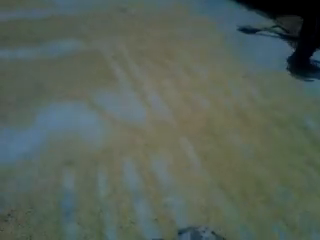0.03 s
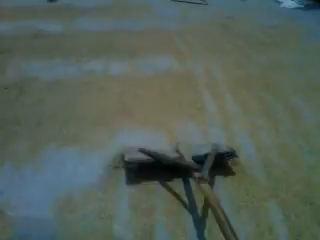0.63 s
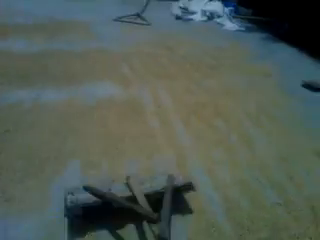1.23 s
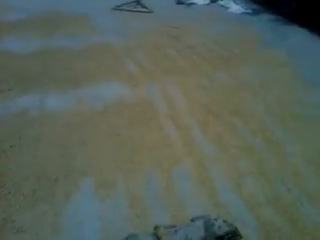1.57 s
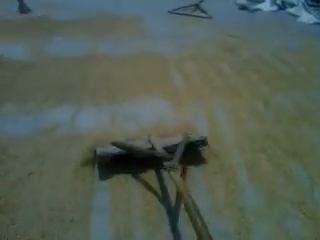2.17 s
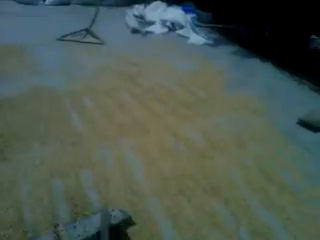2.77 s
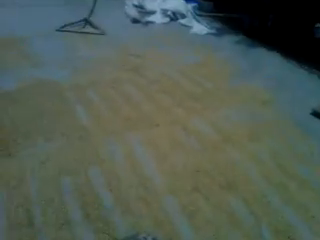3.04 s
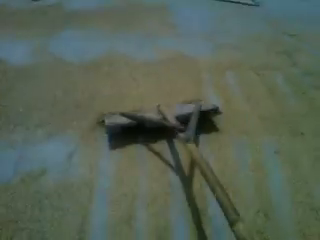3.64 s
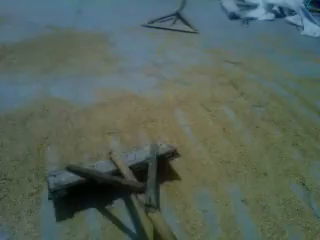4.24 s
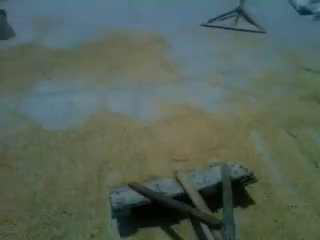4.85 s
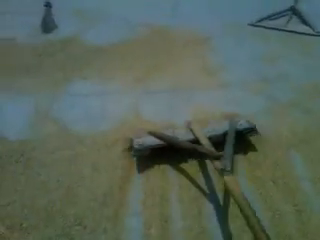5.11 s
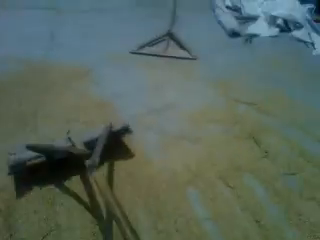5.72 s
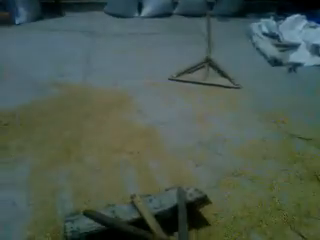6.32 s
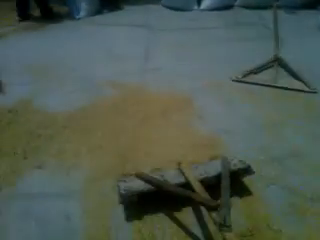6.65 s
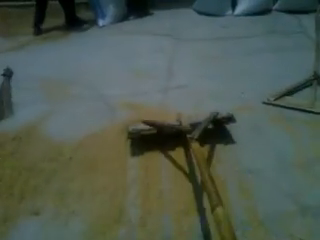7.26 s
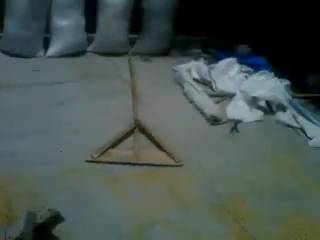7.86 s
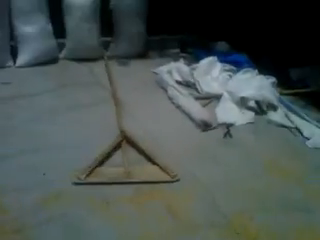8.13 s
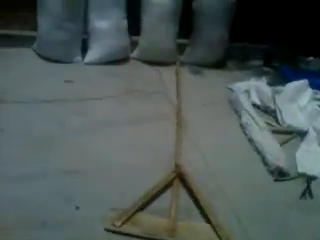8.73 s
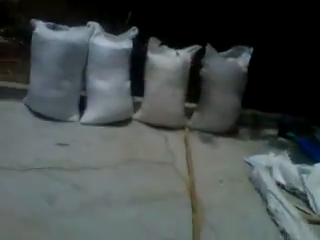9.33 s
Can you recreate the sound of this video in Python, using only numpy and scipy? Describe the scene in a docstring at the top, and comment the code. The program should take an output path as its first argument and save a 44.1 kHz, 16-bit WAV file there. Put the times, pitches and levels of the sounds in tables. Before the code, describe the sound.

Close by, a wooden rake is pushed through dry grain on a concrete yard and drawn lightly back, five times. Each push rasps and rustles, with kernels cracking and scattering. Between pushes the wooden head skids and lands with hollow knocks, and a tooth gives an occasional tiny, sharp squeak. The work ends in light scuffs and soft bumps. A faint low outdoor rumble lies underneath.

```python
"""Raking dry grain

A wooden rake is pushed and drawn back through dry grain on a concrete yard, five strokes, close by.
Kernels crushed under the tines (the rake's teeth) make the wooden head rasp and knock. Husks rustle,
and each push builds a heap that spills and sprays kernels. Between pushes the head skids and lands with
a hollow ring, and a tine sometimes squeaks. The work ends in light scuffs and bumps, over a low rumble."""
import sys
import numpy as np
from scipy import signal
from scipy.fft import rfft, irfft
from scipy.io import wavfile
from scipy.ndimage import uniform_filter1d

SR = 44100
rng = np.random.default_rng(int(sys.argv[2]) if len(sys.argv) > 2 else 0)


def dump_mix(stems):
    """Bounce the given channels to the path in sys.argv[1] as a 16-bit WAV at rate SR."""
    frames = np.atleast_2d(stems).T  # one column per channel
    limited = np.clip(frames, -1, 1)  # hard clip at full scale
    pcm = np.round(limited * 32767).astype(np.int16)
    wavfile.write(sys.argv[1], SR, pcm)


N = 417627
TIME = np.arange(N) / SR

# the modes (natural ringing tones) of the rake's head and handle: pitch_hz, width_hz, level_db
HEAD_MODES = [(161, 47, -17), (302.4, 76, -6), (420.6, 75, -3), (506.6, 102, -2.5), (693.6, 108, -3.5),
              (936, 145, -8.5), (1104, 158, -3), (1366, 202, 0.5), (1488, 170, 0), (1900, 990, -16.5)]
# tone colours of dry husks, spilling grain, grating wood and scuffed concrete: pitch_hz, level_db
HUSK_COLOUR = [(1500, -31), (2000, -27.5), (2400, -6), (2620, 7), (2950, 4), (3300, 4.5), (3650, -6),
               (4000, -33), (4600, -48), (5200, -30.5), (7000, -63.5)]
SPILL_COLOUR = [(2600, -21.5), (3300, 1), (3900, -3.5), (4500, -9), (5100, -17), (6000, -25), (6600, -33.5),
                (7200, -43.5), (8000, -74)]
GRATE_COLOUR = [(120, -31), (300, -9.5), (600, 10.5), (1100, 9), (1800, 3.5), (2400, 3.5), (3400, -4),
                (5000, -31), (7000, -56)]
SCUFF_COLOUR = [(500, -16.5), (900, -5), (1500, -3), (2050, 0), (2400, 3), (3200, -8), (4000, -24.5),
                (6000, -54)]
# the heap topples at the far end of a push and cushions the head: peak_s, level_db, cushion_db
HEAP_FALLS = [(0.79, -28, -4.5), (2.2, -27.5, 0), (3.879, -32.5, -5), (5.46, -30.5, -2.5), (7.27, -32, 0),
              (7.46, -41, 1.5)]


def stroke_level(layer, rest_db, heap_db=0, flow=0):
    """Level in dB of one layer: it follows the rake's speed and pressure, the heap and its flow."""
    # pushes into the grain, then light draws back over it:
    # start_s, attack_s, hold_s, release_s, rasp_db, husk_db, spill_db, pressure_change_db
    pushes = [(0.04, 0.43, 0.27, 0.31, -27.5, -33, -44.5, 4.5),
              (1.56, 0.36, 0.27, 0.35, -30, -34.5, -47, 6),
              (3.14, 0.61, 0.19, 0.26, -26, -31, -42.5, -13.5),
              (4.78, .26, 0.43, 0.28, -30.5, -33.5, -47.5, -10.5),
              (6.41, 0.29, 0.59, 0.34, -32.5, -39.5, -46.5, 3)]
    draws = [(0.0, 0.0012, 0.0061, 0.046, -38, -44.5, -53, -10.5),
             (1.13, 0.11, 0.24, 0.19, -35.5, -36, -52, 2),
             (2.57, 0.041, 0.26, 0.032, -40, -38, -53.5, -1.5),
             (2.83, 0.13, 0.11, 0.1, -34.5, -38.5, -49, -10),
             (4.16, .13, 0.378, 0.02, -41.5, -39, -58.5, -2.5),
             (5.75, 0.22, 0.23, 0.067, -36.5, -41.5, -57, -7.5),
             (7.52, 0.29, 0.16, 0.041, -40.5, -42, -60, 6.5),
             (7.9, 0.12, 0.41, 0.24, -42.5, -53, -68, -7.5),
             (8.54, .08, 0.057, 0.091, -40.5, -53.5, -61, -2),
             (8.77, 0.022, 0.026, 0.053, -46, -52, -59, -11.5), (8.92, 0.053, 0.16, 0.23, -45, -53, -66, 5)]
    power = np.zeros(N)
    for start, attack, hold, release, rasp_db, husk_db, spill_db, pressure_db in pushes + draws:
        end = start + attack + hold + release
        now = (TIME >= start) & (TIME < end)
        speed = np.interp(TIME[now], [start, start + attack, end - release, end], [0, 1, 1, 0]) ** 1.153
        progress = (TIME[now] - start) / (end - start) - .5
        level_db = {"rasp": rasp_db, "husk": husk_db, "spill": spill_db}[layer]
        power[now] += (speed * from_db(level_db + (pressure_db + heap_db) * progress)) ** 2
    return 10 * np.log10(power + flow ** 2 + from_db(rest_db) ** 2)


def lifts(ramp_s=0.013):
    """Change in dB, mostly a dip, of the grinding while the head is off the ground."""
    # moments off the ground: start_s, length_s, change_db
    lift_times = [(0.045, .08, -0.5), (0.947, 0.28, 1.5), (2.522, 0.066, -3), (3.123, 0.072, -2),
                  (4.081, 0.085, -4.5), (4.678, 0.11, -4), (6.216, .18, -0.5), (9.406, .1, -1)]
    return sum(db * np.interp(TIME, [s, s + ramp_s, s + length - ramp_s, s + length], [0, 1, 1, 0])
               for s, length, db in lift_times)


def head_weight(wander_db=0.5):
    """The wavering weight on the head, as a gain in dB for its low modes."""
    # weight, less where the grain lies thin: time_s, gain_db
    weight_curve = [(0.0, 0), (2.0, 0), (3.9, 0), (4.07, -8.5), (4.3, -1), (5.4, 0), (6.2, 0), (6.6, 0),
                    (7.2, -0.5), (7.6, 0.5), (8.45, -2.5), (8.9, 3)]
    return in_time(weight_curve) + wander_db * drift(rate=7.3)


def toppling(rise_s=0.068, settle_s=0.12):
    """Flow of grain as each heap swells, falls over and trickles to rest."""
    return sum(from_db(db) * np.exp(-np.maximum((s - TIME) / rise_s, (TIME - s) / settle_s))
               for s, db, _ in HEAP_FALLS)


def cushioning(rise_s=0.06, hold_s=0.24, fall_s=0.15):
    """Change in dB, mostly a loss, of the head's upper modes while it rides on a fallen heap."""
    corners_s = np.cumsum([-rise_s / 2, rise_s, hold_s, fall_s])
    return sum(db * np.interp(TIME - s, corners_s, [0, 1, 1, 0]) for s, _, db in HEAP_FALLS)


def rasp(judder, weight_db, judder_db=1.88, wander_db=1.54):
    """Kernels grind under the tines and ring the head; weight lifts its low modes, a heap dulls it."""
    # the arms bear down and the head groans low: start_s, length_s, boost_db
    leans = [(1.43, 0.099, 6.5), (2.91, 0.12, 3), (5.9, 0.15, 3), (7.78, 0.13, 4.5), (8.0, 0.09, 3)]
    clicks = kernels(per_s=6000, spread_db=3.0) * from_db(judder_db * judder)
    force = evened(soften(clicks, hz=2000, order=4))
    lean_db, cushion_db = arches(leans), cushioning()
    gains_db = [wander_db * drift(rate=40) + (weight_db if hz < 1000 else cushion_db)
                + lean_db * (hz < 600) for hz, _, _ in HEAD_MODES]
    return rms_one(ring_modes(force, HEAD_MODES, gains_db))


def catches(rasp_db, husk_db, tine_hz, per_s=7, wood_hz=1370, count=200):
    """List the moments when a tine catches on kernels: set ones, plus small ones by chance."""
    # a tine catches, grinds and lets go: start_s, length_s, wood_db, tine_db, tine_pitch_hz
    set_catches = [(0.183, 0.014, -38.5, -31.5, 2600), (0.333, 0.0087, -27, -47, 3000),
                   (0.354, 0.031, -27.5, -35.5, 3260), (0.442, 0.015, -21, -24.5, 3300),
                   (0.514, 0.027, -26, -37, 3400), (0.556, 0.016, -33, -35, 3290),
                   (0.673, 0.02, -27, -31, 3040), (0.727, 0.0073, -21, -19, 2960),
                   (0.801, 0.0079, -28, -21, 3040), (0.831, 0.0038, -41.5, -18, 3170),
                   (0.983, 0.0042, -37, -28.5, 2750), (1.061, 0.028, -50, -35, 2680),
                   (1.2163, 0.0039, -50, -28, 2810), (1.285, 0.0045, -28, -22.5, 2900),
                   (1.311, 0.018, -33, -40, 3050), (1.465, 0.038, -30, -38, 2900),
                   (1.552, 0.023, -38.5, -32.5, 3130), (1.879, 0.0097, -35, -29.5, 3400),
                   (2.42, 0.0046, -36, -24, 2760), (2.609, 0.05, -61, -33.5, 2800),
                   (2.681, 0.0066, -37, -32, 2880), (2.711, 0.015, -32, -34, 2750),
                   (2.758, 0.015, -33.5, -49, 2800), (2.866, 0.0034, -29, -35, 3160),
                   (2.971, 0.017, -32.5, -34.5, 3200), (2.984, .005, -27, -32, 2950),
                   (3.02, 0.0088, -45, -28, 3200), (3.056, 0.022, -40.5, -30.5, 2430),
                   (3.09, 0.042, -48, -41.5, 2800), (3.117, 0.0087, -40, -37, 3330),
                   (3.618, 0.0079, -25.5, -26.5, 2900), (3.658, 0.018, -27.5, -40, 3000),
                   (3.7325, 0.0036, -15, -24, 3050), (4.166, 0.022, -49, -39.5, 2700),
                   (4.21, 0.015, -43, -34, 2700), (4.268, 0.004, -49, -30.5, 2750),
                   (4.281, 0.012, -36, -29.5, 2800), (4.3, 0.045, -46, -36, 2850),
                   (4.34, 0.004, -46, -29, 2700), (4.545, 0.02, -35, -39, 2750),
                   (4.634, .016, -40.5, -37.5, 2730), (4.659, 0.0081, -49, -32, 3180),
                   (5.575, 0.014, -44, -29.5, 2950), (5.95, 0.015, -35, -43, 2800),
                   (5.962, 0.038, -33, -33.5, 2950), (6.096, 0.012, -31, -41, 2700),
                   (6.128, 0.013, -34, -31.5, 2720), (6.176, 0.043, -42, -43, 2840),
                   (6.506, 0.061, -43.5, -41.5, 2920), (6.584, 0.022, -32, -42, 2920),
                   (6.66, 0.0086, -29, -37, 2800), (6.708, 0.008, -28, -40, 2750),
                   (6.799, 0.016, -29, -46, 2800), (6.812, 0.016, -26.5, -49, 2800),
                   (6.886, 0.0099, -29.5, -29, 2770), (6.949, 0.0055, -31, -34, 2850),
                   (6.977, 0.0027, -19.5, -35, 2900), (7.09, 0.0074, -30, -26, 3070),
                   (7.105, 0.01, -24.5, -36, 3000), (7.152, 0.006, -25, -31, 3150),
                   (7.199, 0.0025, -28, -24, 2750), (7.214, 0.0058, -23.5, -23, 3040),
                   (7.459, 0.013, -32, -26.5, 3020), (7.484, 0.017, -35, -29, 2890),
                   (7.571, 0.0062, -45, -26.5, 2700), (7.578, 0.0074, -33, -43, 3360),
                   (7.619, 0.0055, -39, -36.5, 3500), (7.648, 0.0023, -31, -30.5, 3130),
                   (7.729, 0.017, -36, -33.5, 3200), (7.752, .011, -45, -31, 3200),
                   (7.778, 0.0063, -36, -37, 2800), (7.826, 0.0055, -38, -37, 2680),
                   (7.943, 0.0056, -31, -30.5, 3080), (7.982, 0.0063, -33, -46, 2900),
                   (8.048, 0.0043, -35, -35, 3100), (8.077, 0.0036, -44, -35.5, 3500),
                   (8.093, 0.0087, -35, -29.5, 2800), (8.19, 0.01, -30, -40, 2460),
                   (8.261, 0.0048, -32.5, -46, 2750), (8.31, 0.0018, -24.5, -42, 2740),
                   (8.367, 0.02, -33.5, -42, 2750), (8.384, 0.012, -28, -45, 2780),
                   (8.493, 0.034, -36.5, -48, 2770), (8.527, 0.012, -35.5, -48, 2750),
                   (8.628, 0.015, -36, -46, 2730)]
    rows = list(set_catches)
    wood_pitches = wood_hz * np.exp(0.079 * rng.standard_normal(2 * count))
    chances = np.clip(rng.standard_normal((count, 4)), -2, 2)
    starts = np.cumsum(rng.exponential(1 / per_s, count))
    for start, (stretch, wood, tine, detune) in zip(starts, chances):
        if start < set_catches[-1][0]:  # none once the raking has stopped
            at = int(start * SR)
            length = 0.0083 * np.exp(.5 * stretch)
            wood_db, tine_db = rasp_db[at] - 4 + 2 * wood, husk_db[at] - 6.5 + 2 * tine
            rows.append((start, length, wood_db, tine_db, tine_hz[at] * np.exp(0.056 * detune)))
    return [(*row, hz) for row, hz in zip(rows, wood_pitches)]


def knocks(catch_list, buried, focus_db=7.0, vary_db=0.9, width_hz=230, overtone_hz=4150):
    """Each catch rings the head, frame and tine while kernels crack and the wood grates on the floor."""
    out, cracks, scrapes = np.zeros((3, N))
    frame_db = np.interp(buried, [0, 1], [-5.5, -13])  # deep grain damps the frame
    splinter_db = np.interp(buried, [0, 1], [-19, -11.5])  # and adds bright splinters
    mode_hz = np.array(HEAD_MODES)[:, 0]
    brief_db = -6 * (mode_hz < 600)  # so brief a blow hardly moves the low modes
    for start, length, wood_db, tine_db, tine_hz, wood_hz in catch_list:
        gains_db = brief_db - focus_db * np.sqrt(2 * np.abs(np.log2(mode_hz / wood_hz)))
        force = soften(crush(length), hz=2250, order=4)
        wood = ring_modes(force, HEAD_MODES, gains_db + vary_db * rng.standard_normal(len(mode_hz)))
        tine = double_resonance(crush(length), tine_hz, width_hz, widen=3)
        tine += from_db(-17) * resonance(crush(length), overtone_hz, 2 * width_hz)
        frame = frame_ring(length, wood_hz)
        add(out, start, at_level(wood, wood_db - 2, length))
        add(out, start, at_level(frame, wood_db + frame_db[int(start * SR)], length))
        add(out, start, at_level(soften(tine, hz=3940, order=6), tine_db - 3, length))
        add(cracks, start, at_level(crush(length, skew=.6, snap=0.69), tine_db, length))
        add(scrapes, start, at_level(crush(length), wood_db, length))
    grating = from_db(-8) * coloured(scrapes, GRATE_COLOUR)
    crunch = from_db(2) * coloured(cracks, HUSK_COLOUR)
    splinters = from_db(splinter_db) * coloured(cracks, SPILL_COLOUR)
    return out + grating + crunch + splinters


def frame_ring(length, centre_hz, focus_db=10.5):
    """A blow rings the rake's frame, most of all the modes near one pitch."""
    # the frame's hollow modes: pitch_hz, width_hz, level_db
    frame_modes = [(713, 36, -1.5), (1100, 78, -3.5), (1492, 56, -0.5), (1925, 78, -11.5), (2720, 66, -6.5),
                   (3050, 70, -13.5)]
    gains_db = -focus_db * np.abs(np.log2(np.array(frame_modes)[:, 0] / centre_hz))
    return ring_modes(soften(crush(length), hz=3400), frame_modes, gains_db)


def crush(length, skew=0.71, snap=1.15, snap_s=0.00092, rattle_db=3.0, rattle_per_s=260, size=3500):
    """One kernel snaps, then a rattling run of tiny breaks swells and dies away."""
    t = np.arange(size) / SR
    swell = np.abs(np.sin(np.pi * np.minimum(t / length, 1) ** skew)) ** 1.5
    rattle = from_db(rattle_db * np.interp(t * rattle_per_s, np.arange(size), rng.standard_normal(size)))
    first_snap = snap * t / snap_s * np.exp(1 - t / snap_s)
    return rng.standard_normal(size) * (swell * rattle + first_snap)


def kernels(per_s, spread_db):
    """Clicks of single kernels at random moments: many small, a few large."""
    sizes = from_db(spread_db * np.minimum(rng.exponential(1, N), 4)) * rng.choice([-1, 1], N)
    return sizes * (rng.random(N) < per_s / SR)


def ticking(judder, centre_hz, width_hz=210, focus_db=14, judder_db=3.0, count=10):
    """Each kernel rings briefly at its own pitch; those near the centre pitch are loudest."""
    clicks = kernels(per_s=2600, spread_db=6.0) * from_db(judder_db * judder)
    pitch_index = rng.integers(0, count, N)
    rings = np.zeros(N)
    for k, hz in enumerate(np.geomspace(2600, 3750, count)):
        gain = from_db(-focus_db * np.abs(np.log2(hz / centre_hz)))
        rings += gain * resonance(clicks * (pitch_index == k), hz, width_hz)
    return evened(coloured(rings, HUSK_COLOUR))


def rustle(judder, colour, per_s, spread_db, judder_db, clump_db):
    """Husks, grain or grit tick together in clumps, pushed by the shaking tines."""
    ticks = kernels(per_s, spread_db) * from_db(judder_db * judder + clump_db * drift(rate=240))
    return evened(coloured(ticks, colour))


def cracking(snap_s=.0007, size=900):
    """A kernel cracks on the concrete: a tiny burst that rings briefly, with a dry edge."""
    # single sharp cracks: start_s, level_db, pitch_hz
    cracks = [(0.854, -31, 2850), (0.864, -25, 2900), (0.884, -27, 3100), (0.905, -24.5, 2630),
              (2.005, -23, 3100), (2.064, -22.5, 3040), (2.1374, -22, 2900), (2.2015, -31, 3190),
              (2.3352, -26.5, 3200), (3.8189, -19.5, 2720), (3.9024, -18, 3050), (5.218, -21, 2650),
              (5.3125, -26, 3290), (5.4027, -25.5, 3280), (5.4504, -21.5, 3000), (5.5184, -21.5, 3260),
              (7.013, -24, 3000), (7.038, -26, 3000), (7.065, -28, 3150), (7.198, -22, 2870),
              (7.298, -29, 3250), (7.3312, -26, 3200), (7.346, -22, 2980), (7.3605, -23, 3230),
              (7.397, -22, 3190), (7.4441, -28, 3130), (7.479, -20.5, 2870)]
    out, t = np.zeros(N), np.arange(size) / SR
    for start, db, hz in cracks:
        bursts = rng.standard_normal((2, size)) * np.exp(-t / snap_s)
        ring = double_resonance(bursts[0], hz, width_hz=420, widen=3)
        edge = coloured(bursts[1], SPILL_COLOUR)
        add(out, start, at_level(ring, db - 1, span_s=.002) + at_level(edge, db - 11, span_s=.002))
    return soften(out, hz=4800, order=10)


def spray(judder, scatter=0.047, judder_db=3.5, count=22):
    """Thrown kernels skitter on the concrete, mostly ringing lower as they slow."""
    # kernels thrown off the head: start_s, length_s, level_db, first_pitch_hz, last_pitch_hz
    throws = [(0.66, 0.24, -40, 4240, 3400), (1.152, 0.19, -42.5, 3650, 3800),
              (1.954, 0.58, -43, 4120, 3460), (3.512, 0.56, -44, 4430, 3640),
              (4.963, 0.43, -46.5, 4500, 4200), (5.303, 0.4, -47, 4070, 3680),
              (6.878, 0.78, -46.5, 4600, 3680), (7.666, 0.052, -43, 3780, 3200)]
    gain, centre_hz = np.zeros(N), np.ones(N)
    for start, length, db, first_hz, last_hz in throws:
        now = (TIME >= start) & (TIME < start + length)
        progress = (TIME[now] - start) / length
        gain[now] = from_db(db) * np.abs(np.sin(np.pi * progress)) ** 0.85
        centre_hz[now] = first_hz + (last_hz - first_hz) * progress
    pitches_hz = np.geomspace(2700, 4900, count)
    pitch_index = np.searchsorted(pitches_hz, centre_hz * np.exp(scatter * rng.standard_normal(N)))
    clicks = kernels(per_s=1600, spread_db=5.0) * from_db(judder_db * judder)
    rings = sum(double_resonance(clicks * (pitch_index == k), hz, width_hz=330, widen=4)
                for k, hz in enumerate(pitches_hz))
    return gain * evened(soften(rings, hz=4750, order=10))


def skids(judder):
    """The head's edge scuffs over bare concrete and drags fine, bright grit along."""
    # each skid: start_s, length_s, scuff_db, grit_db
    slides = [(0.14, 0.067, -48, -53), (1.402, 0.074, -37.5, -50), (1.546, 0.064, -42, -67),
              (2.603, 0.084, -50, -66), (2.936, 0.18, -37.5, -66), (4.494, 0.012, -25.5, -40),
              (4.531, 0.075, -46, -61.5), (4.629, 0.022, -38, -62), (6.086, 0.037, -35, -58),
              (6.155, 0.04, -47, -55), (6.402, 0.017, -39, -48), (6.49, 0.064, -55, -53.5),
              (7.1975, 0.004, -26, -43), (7.215, 0.0082, -29.5, -38), (7.458, 0.056, -37.5, -60),
              (7.84, 0.022, -40, -49), (7.934, 0.06, -43, -56), (8.185, 0.02, -39, -53),
              (8.302, 0.03, -47, -59), (8.594, 0.15, -47.5, -62)]
    # tone colour of the grit: pitch_hz, level_db
    grit_colour = [(2500, -18.5), (3600, -3), (4300, 5), (5200, -4.5), (6000, -14), (6600, -24),
                   (7200, -41.5)]
    scuff_gain = arches([(s, length, from_db(db)) for s, length, db, _ in slides])
    grit_gain = arches([(s, length, from_db(db)) for s, length, _, db in slides])
    scuff = rustle(judder, SCUFF_COLOUR, per_s=9000, spread_db=1.0, judder_db=1.0, clump_db=2.0)
    grit = rustle(judder, grit_colour, per_s=3800, spread_db=4.0, judder_db=2.5, clump_db=6.5)
    return scuff_gain * scuff + grit_gain * grit


def landings():
    """The head drops: the hollow ring of the frame, a dull thud and a crunch of kernels."""
    # drops onto the floor: start_s, length_s, level_db, pitch_hz, crunch_db
    drops = [(4.816, 0.012, -41, 720, -44), (4.964, 0.0065, -23.5, 720, -31),
             (4.993, 0.0094, -24.5, 720, -48), (5.005, 0.0046, -19.5, 1300, -39),
             (5.012, 0.052, -29.5, 850, -47), (5.829, 0.008, -44, 1100, -31.5),
             (6.102, 0.012, -26, 1350, -38), (6.177, 0.024, -32.5, 1450, -44), (6.3, 0.0098, -40, 720, -47),
             (6.4045, 0.0069, -29.5, 740, -34.5)]
    out = np.zeros(N)
    for start, length, db, hz, crunch_db in drops:
        add(out, start, at_level(frame_ring(length, hz), db, length))
        thud = soften(coloured(crush(length), GRATE_COLOUR), hz=1250, order=4)
        add(out, start, at_level(thud, db - 7, length))
        add(out, start, at_level(coloured(crush(length), HUSK_COLOUR), crunch_db, length))
    return out


def squeaks(sag=0.068, snap_s=0.00076):
    """A tine snaps onto the concrete, then sticks and slips in a chirp whose pitch sags."""
    # chirps with a rattle at half their pitch: start_s, level_db, pitch_hz, length_s, rattle_db
    chirps = [(0.93, -19.5, 2642, 0.0066, -27), (1.277, -15.5, 2840, 0.0067, -4),
              (4.5017, -6.5, 2657, 0.0092, -28), (7.8378, -13, 2650, 0.012, -28),
              (7.86, -22, 2650, 0.0086, -30), (7.872, -29, 2680, 0.009, -28)]
    out = np.zeros(N)
    for start, db, hz, length, rattle_db in chirps:
        progress = np.linspace(0, 1, round(length * SR))
        phase = 2 * np.pi * np.cumsum(hz * (1 + sag * (.5 - progress))) / SR
        swell = np.sin(np.pi * progress ** 0.53) ** 2
        rattle = np.sin(phase / 2) + from_db(-9) * np.sin(3 * phase / 2)
        tone = from_db(db) * swell * (np.sin(phase) + from_db(rattle_db) * rattle)
        # a faint high distortion as the loudest squeak overloads the microphone
        overload = np.minimum(from_db(db + 7) * swell, 1) ** 12 * np.sin(3 * phase)
        add(out, start, tone + from_db(-53) * overload)
        snap = soften(coloured(crush(snap_s), SPILL_COLOUR), hz=4400, order=8)
        add(out, start - snap_s / 2, at_level(snap, db - 29, snap_s))
    return out


def bumps(length_s=0.032, vary_db=7.0):
    """Soft, drawn-out contacts ring a few low, hollow modes as the wood is handled."""
    # each bump: start_s, level_db
    contacts = [(8.658, -43), (8.815, -43), (8.981, -38), (9.070, -42), (9.126, -44.5), (9.168, -41),
                (9.255, -40), (9.339, -48)]
    # the wood's hollow modes: pitch_hz, width_hz, level_db
    hollow_modes = [(206, 20, -11.5), (397, 29, 0), (742, 85, -9.5)]
    out = np.zeros(N)
    for start, db in contacts:
        force = soften(crush(length_s, size=6000), hz=1200)
        ring = ring_modes(force, hollow_modes, vary_db * rng.standard_normal(len(hollow_modes)))
        add(out, start, at_level(ring, db, span_s=0.02))
    return out


def yard_echo(x, echo_db=-17, decay_s=0.02, size=8000):
    """Add faint echoes from the floor, sacks and wall."""
    t = np.arange(size) / SR
    echoes = rng.standard_normal(size) * (rng.random(size) < .02) * np.exp(-t / decay_s) * (t > .004)
    return x + signal.oaconvolve(x, at_level(echoes, echo_db, span_s=1 / SR))[:N]


def yard_rumble():
    """The yard's low rumble, with a faint, wavering hum."""
    # how loud the background is: time_s, level_db
    rumble_curve = [(0.0, -51.5), (3.2, -53), (4.3, -57.5), (5.7, -59.5), (7.1, -57), (9.47, -64)]
    # tone colour of the rumble: pitch_hz, level_db
    rumble_colour = [(20, -11.5), (48, -11), (65, -7), (100, -3.5), (122, 1.5), (190, 3), (270, -2.5),
                     (500, -9.5), (1200, -18), (3000, -57)]
    rumble = rms_one(coloured(rng.standard_normal(N), rumble_colour))
    hum = rms_one(double_resonance(rng.standard_normal(N), hz=84, width_hz=9, widen=2))
    return from_db(in_time(rumble_curve)) * (from_db(6.5) * rumble + from_db(-6) * hum)


def from_db(db):
    """Turn decibels into a gain."""
    return np.exp(np.asarray(db) * np.log(10) / 20)


def rms_one(x):
    """Scale to an average power of 1."""
    return x / np.sqrt(np.mean(x ** 2) + 1e-20)


def evened(x, size=4001):
    """Hold the power at 1 over about a tenth of a second; quicker changes stay."""
    power = uniform_filter1d(uniform_filter1d(x ** 2, size), size)
    return x / np.sqrt(np.maximum(power, 1e-12))


def at_level(sound, db, span_s):
    """Give a short sound the energy of that level held for span_s."""
    return from_db(db) * sound * np.sqrt(span_s * SR / np.sum(sound ** 2))


def add(out, start_s, sound):
    """Mix a short sound in at a given time."""
    at = max(round(start_s * SR), 0)
    out[at:at + len(sound)] += sound[:N - at]


def in_time(points):
    """Join (time_s, value) points with straight lines."""
    return np.interp(TIME, *np.transpose(points))


def arches(rows):
    """One smooth arch for each row of start_s, length_s, height."""
    return sum(height * np.sin(np.pi * np.clip((TIME - s) / length, 0, 1)) for s, length, height in rows)


def drift(rate):
    """A random curve of typical size 1 that turns about rate times a second."""
    points = rng.standard_normal(20000)
    return rms_one(np.interp(TIME * rate, np.arange(len(points)), points))


def soften(x, hz, order=2):
    """Fade the treble above hz, as a broad contact does."""
    return signal.sosfilt(signal.butter(order, hz, fs=SR, output="sos"), x)


def cut_treble(x, hz):
    """Cut off steeply everything above hz."""
    return signal.sosfilt(signal.ellip(10, .1, 80, hz, fs=SR, output="sos"), x)


def coloured(x, colour, size=4096):
    """Filter a sound so that it takes on a tone colour."""
    hz, db = np.transpose(colour)
    grid_hz = np.maximum(np.fft.rfftfreq(size, 1 / SR), 1)
    cepstrum = irfft(np.log(from_db(np.interp(np.log(grid_hz), np.log(hz), db))))
    # minimum phase: the filter rings only after a click, never before it
    cepstrum[1:size // 2] *= 2
    cepstrum[size // 2 + 1:] = 0
    return signal.oaconvolve(x, irfft(np.exp(rfft(cepstrum))))[:len(x)]


def resonance(x, hz, width_hz):
    """Ring one mode; the narrower it is, the longer it rings."""
    decay = np.exp(-np.pi * width_hz / SR)
    feedback = [1, -2 * decay * np.cos(2 * np.pi * hz / SR), decay ** 2]
    return signal.lfilter(np.array([1, 0, -1]) * (1 - decay ** 2) / 2, feedback, x + 1e-18)


def double_resonance(x, hz, width_hz, widen):
    """A mode followed by a wider one at the same pitch, for a purer ring."""
    return resonance(resonance(x, hz, width_hz), hz, widen * width_hz)


def ring_modes(force, modes, gains_db):
    """Ring several modes at once, with alternating signs and an extra gain for each."""
    return sum((-1) ** k * from_db(db + extra_db) * resonance(force, hz, width_hz)
               for k, ((hz, width_hz, db), extra_db) in enumerate(zip(modes, gains_db)))


def scene():
    """The strokes and the rake's judder (its quick shaking) drive the grain sounds together."""
    uneven_db = 1.5 * drift(rate=36) + lifts()  # the grain lies thicker here, thinner there
    flow = toppling()
    # rest_db is the grain settling between strokes
    rasp_db = stroke_level("rasp", rest_db=-48.5) + uneven_db
    husk_db = stroke_level("husk", rest_db=-53.5, heap_db=6, flow=flow) + uneven_db
    spill_db = stroke_level("spill", rest_db=-60.5, flow=from_db(-21.5) * flow) + uneven_db
    scuff_db = rasp_db + np.interp(rasp_db, [-45.5, -27], [-5, -15.5])  # more scuff in a light touch
    weight_db = head_weight()
    # kernels and tines ring higher when more grain moves; each clump has its own pitch
    tick_hz = np.interp(spill_db, [-58, -44], [2800, 3200]) * np.exp(0.07 * drift(rate=57))
    tine_hz = np.interp(spill_db, [-54, -44], [2700, 3096])
    buried = np.interp(spill_db, [-55, -45], [0, 1])  # how deep the head sits in the grain
    bite = np.interp(husk_db, [-54, -38], [.45, 0.95])  # a light touch slides more smoothly
    judder = bite * rms_one(drift(rate=130) + drift(rate=310))

    head = from_db(rasp_db - 0.69) * rasp(judder, weight_db)
    scuff = from_db(scuff_db + 0.7) * rustle(
        judder, SCUFF_COLOUR, per_s=9000, spread_db=0.0, judder_db=4.5, clump_db=3.0)
    ticks = from_db(husk_db - 1.5) * ticking(judder, tick_hz)
    husks = from_db(husk_db - 9.0) * rustle(
        judder, HUSK_COLOUR, per_s=6000, spread_db=1.0, judder_db=0.5, clump_db=-2.5)
    spill = from_db(spill_db + 1.5) * rustle(
        judder, SPILL_COLOUR, per_s=7800, spread_db=3.5, judder_db=2.5, clump_db=2.0)
    rumble = yard_rumble()
    grain = head + scuff + ticks + husks + spill + spray(judder) + cracking() + skids(judder)
    blows = knocks(catches(rasp_db, husk_db, tine_hz), buried) + landings() + bumps()
    # the raking and rumble are cut off steeply above about 7 kHz
    raking = cut_treble(yard_echo(grain + blows) + rumble, hz=7100)
    return (raking + yard_echo(squeaks()))[None]


def record(dry):
    """The microphone misses the highest treble."""
    return cut_treble(dry, hz=8600)


dry = scene()
out = record(dry)
dump_mix(out)
```